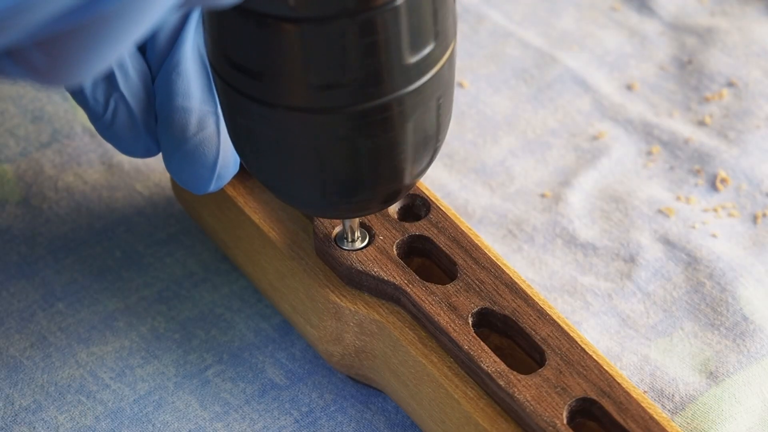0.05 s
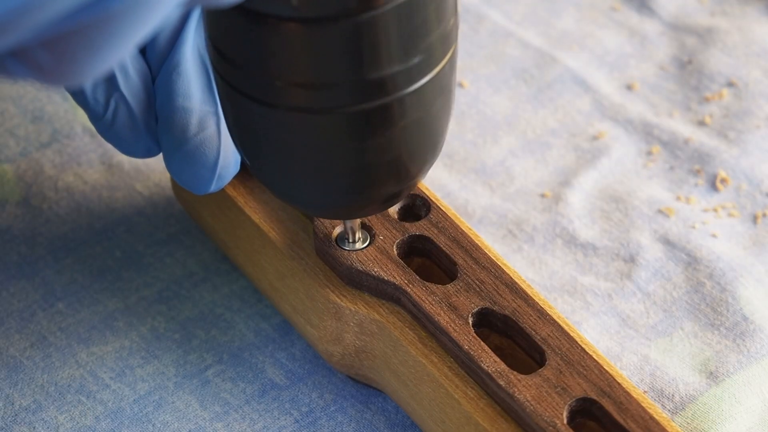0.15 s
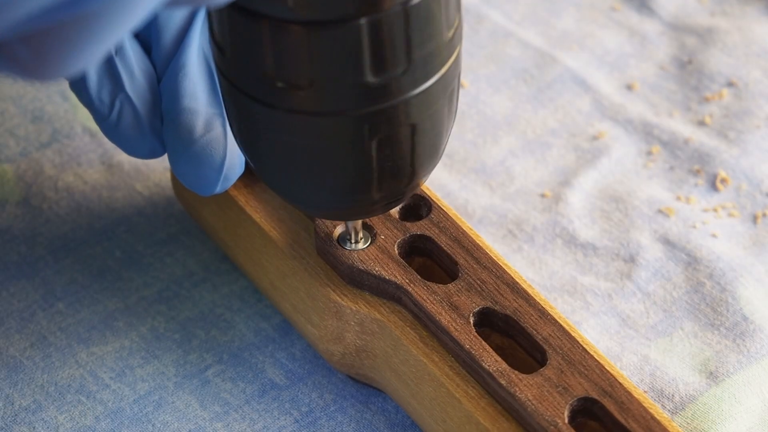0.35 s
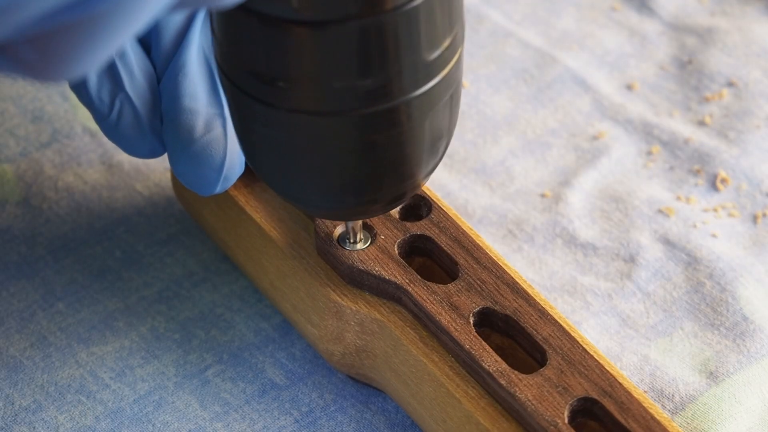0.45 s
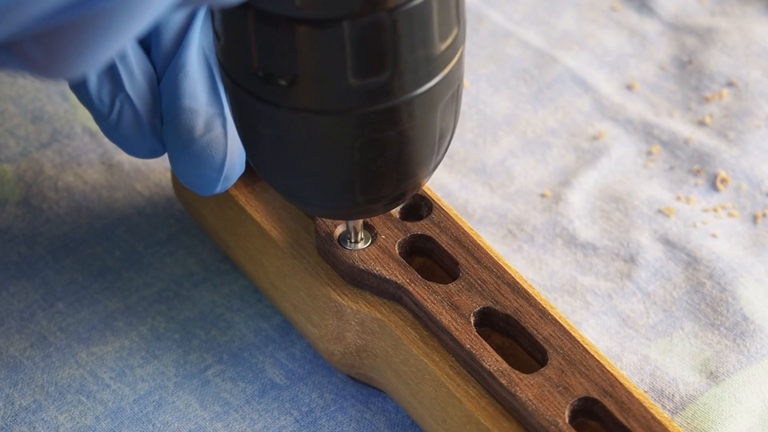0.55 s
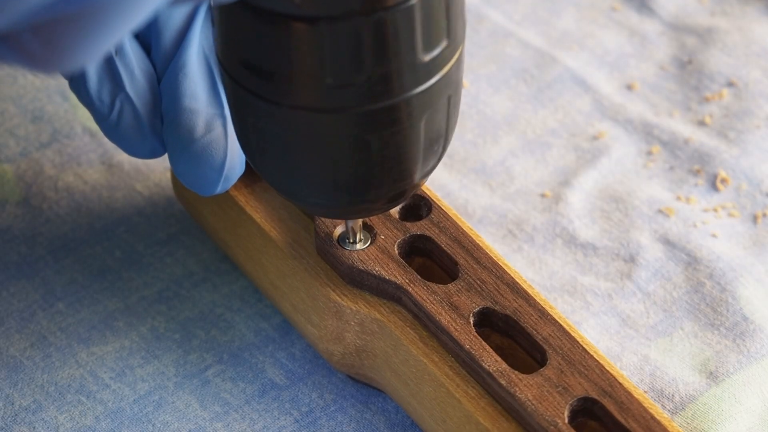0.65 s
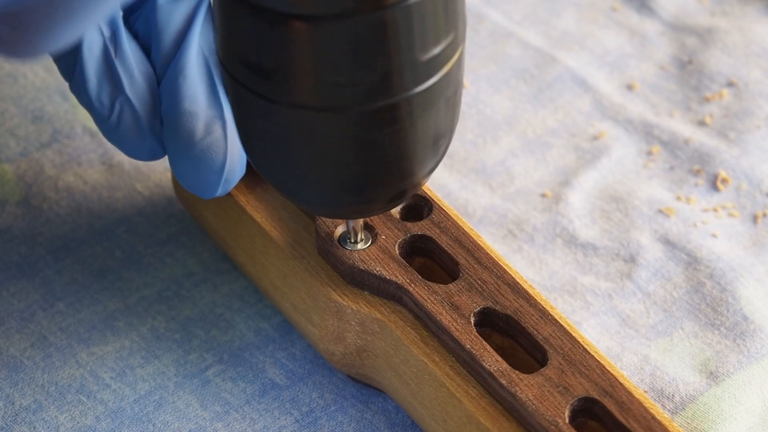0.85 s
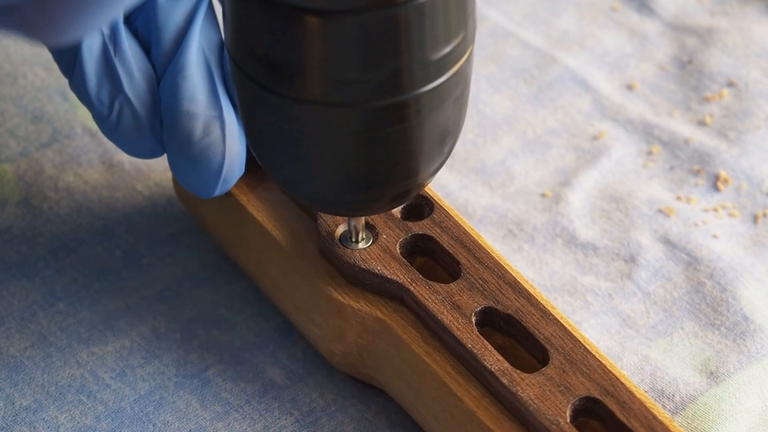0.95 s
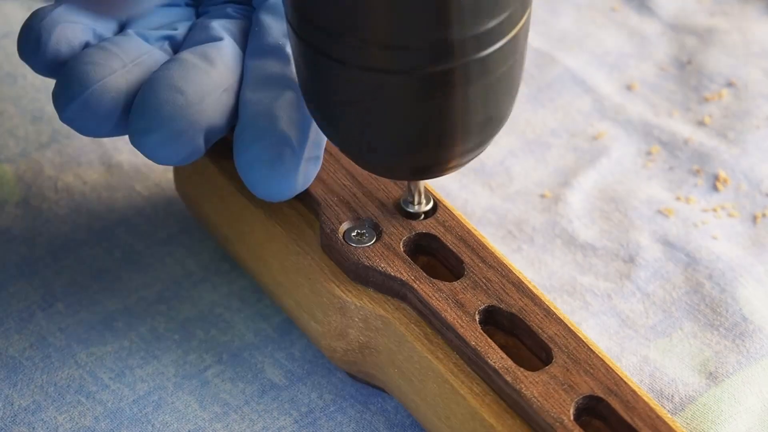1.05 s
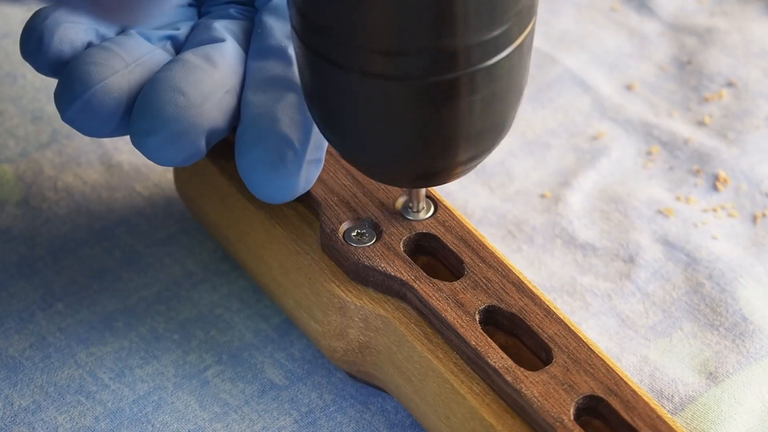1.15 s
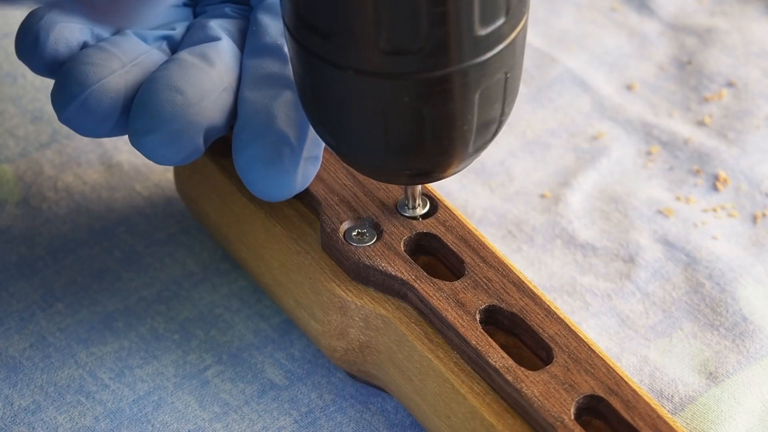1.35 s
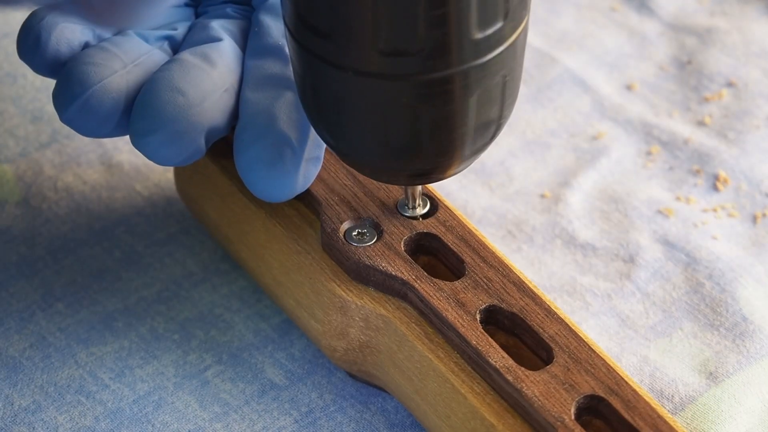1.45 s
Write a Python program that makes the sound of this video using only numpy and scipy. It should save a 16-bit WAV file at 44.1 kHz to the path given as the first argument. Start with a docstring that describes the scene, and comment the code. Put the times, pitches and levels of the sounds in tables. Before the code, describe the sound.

Close cordless drill whirring and clicking on a screw in wood, then ratcheting and winding down.

```python
"""In a small, dry workshop, a cordless drill drives a screw into wood, close to the microphones.
The speed controller whistles, motor and gears wind up, and the bit knocks in the screw head ever
more slowly. A second squeeze of the trigger makes the clutch ratchet; then the motor runs free
for a moment and coasts to a stop."""
import sys
import numpy as np
from scipy import signal
from scipy.fft import rfft, irfft, next_fast_len
from scipy.io import wavfile
from scipy.ndimage import map_coordinates

SR = 44100
rng = np.random.default_rng(int(sys.argv[2]) if len(sys.argv) > 2 else 0)


def inscribe(sig):
    """Save sig as 16-bit PCM at rate SR to the path in sys.argv[1].

    A 1-D sig is mono; a 2-D sig holds one channel per row.
    Samples are clipped to [-1, 1] before scaling.
    """
    pcm = np.round(np.clip(np.atleast_2d(sig).T, -1, 1) * 32767)
    wavfile.write(sys.argv[1], SR, pcm.astype(np.int16))


N = 66150


def amp(db):
    """Turn decibels into a gain."""
    return 10 ** (np.asarray(db) / 20)


def unit(x):
    """Scale to an average power of 1."""
    return x / np.sqrt(np.mean(x ** 2) + 1e-20)


def along(points, hz):
    """Read a table of (frequency, value) points on a log axis."""
    f, v = np.transpose(points)
    return np.interp(np.log(hz + 1), np.log(f + 1), v)


def curve(points):
    """Read a table of (time, value) points at every sample."""
    return np.interp(np.arange(N) / SR, *np.transpose(points))


def wobble(rate):
    """A smooth curve through `rate` random values a second."""
    return map_coordinates(rng.standard_normal(int(N * rate / SR) + 4), [np.arange(N) * rate / SR])


def filtered(x, response):
    """Multiply each frequency in x by response(frequency)."""
    size = 2 * next_fast_len(N)
    return irfft(rfft(x, size) * response(np.fft.rfftfreq(size, 1 / SR)), size)[..., :N]


def causal(gain):
    """A filter of this shape and power 1 that rings after a hit, never before (minimum phase)."""
    cepstrum = irfft(np.log(unit(gain) + 1e-6))
    cepstrum[1:len(cepstrum) // 2] *= 2
    cepstrum[len(cepstrum) // 2 + 1:] = 0
    return np.exp(rfft(cepstrum))


# pitches at which drill and wood ring: f/Hz, width/Hz, relative level/dB
RESONANCES = [(353, 60, 2), (541, 28, -1.5), (1460, 99, -2), (1730, 140, -9), (3500, 270, 4),
              (5570, 1400, -2), (9170, 1200, -2)]
def body(hz, ring_db):
    """Drill and wood boost the sound near their own pitches; ring_db sets how much."""
    peaks = sum(amp(db + ring_db) ** 2 / (1 + (2 * (hz - centre) / width) ** 2)
                for centre, width, db in RESONANCES)
    return np.sqrt(1 + peaks)


# how alike left and right are: f/Hz, likeness (1 or more means the same)
LIKENESS = [(60, 0.5), (400, 0.88), (1400, 2), (3000, 0.72), (9200, 0.5), (14000, -0.3)]
def radiate(pair, colour, ring_db=-60):
    """Give two unrelated signals a tone colour and spread them over left and right."""
    def response(hz):
        angle = np.arccos(np.clip(along(LIKENESS, hz), -1, 1)) / 2
        return causal(amp(along(colour, hz)) * body(hz, ring_db)) * [np.cos(angle), np.sin(angle)]
    mid, side = filtered(pair, response)
    return np.array([mid + side, mid - side])


def blows(rows, attack_s, decay_s, rattle_db, rattle_s, repeat=0):
    """Each hit is a sharp noise burst with a weaker rattle; the share `repeat` is alike every time."""
    out, t = np.zeros((2, N + SR)), np.arange(SR // 20) / SR
    fade = np.exp(-t / decay_s) + amp(rattle_db) * np.exp(-t / rattle_s)
    shape = (1 - np.exp(-t / attack_s)) * fade
    pattern = rng.choice([-1, 1], (2, len(t)))
    for start, db in rows:
        fresh = rng.choice([-1, 1], pattern.shape)
        burst = shape * (np.sqrt(repeat) * pattern + np.sqrt(1 - repeat) * fresh)
        burst /= np.linalg.norm(burst, axis=1, keepdims=True)
        out[:, round(start * SR):][:, :len(t)] += amp(db) * burst
    return out[:, :N]


# tone colour of the background: f/Hz, relative level/dB
BACKGROUND_COLOUR = [(25, 0), (140, 0), (1000, -9), (15000, -40)]
def background():
    """A faint, steady, low rush of noise."""
    return amp(-66.5) * radiate(rng.standard_normal((2, N)), BACKGROUND_COLOUR)


# how long the echo takes to fade by 60 dB: f/Hz, t/s
ECHO_FADE = [(200, 0.29), (12000, 0.2)]
def room(x):
    """The room answers with a short, blurred echo, different on each side."""
    hz, t, noise = signal.stft(rng.standard_normal((2, SR // 4)), SR, nperseg=256)
    tail = signal.istft(noise * amp(-60 * t / along(ECHO_FADE, hz)[:, None]), SR, nperseg=256)[1]
    return signal.fftconvolve(x, tail / np.linalg.norm(tail[0]), axes=1)[:, :N]


def bench(knocks, low_hz=135, width_hz=70):
    """Each knock thuds softly through the wood into the cloth-covered bench."""
    hits = [(start, -15) for start, *_ in knocks]
    thuds = blows(hits, attack_s=.00094, decay_s=.0093, rattle_db=-3, rattle_s=.02)[0]
    return filtered(thuds, lambda f: 1j * f * width_hz / (low_hz ** 2 - f ** 2 + 1j * f * width_hz))


# buzz while the motor creeps: t/s, relative level/dB
BUZZ_LEVEL = [(.025, -52.5), (.1, -67), (.165, -49.5), (.25, -66), (.4, -100)]
def brushes(turns, ring_hz=4710, width_hz=460):
    """The motor's sliding contacts tick twice a turn and ring at one high pitch."""
    ticks = np.diff(np.floor(2 * turns), prepend=0) * amp(2.7 * wobble(200))
    ring = filtered(ticks, lambda f: (2j * f * width_hz / (ring_hz**2 - f**2 + 2j * f * width_hz)) ** 2)
    return amp(curve(BUZZ_LEVEL) + .5) * unit(ring)


# loudness of the whistle: t/s, level/dB
WHISTLE_LEVEL = [(.11, -59), (.16, -51), (.25, -48), (.45, -55), (.745, -68), (.775, -49.5), (.85, -50),
                 (1.05, -54), (1.09, -47), (1.185, -47), (1.21, -85)]
def controller(switch_hz=3886, overtone_end_s=.16):
    """The switched motor current whistles at one pitch until the trigger is let go."""
    t = np.arange(N) / SR
    phase = 2 * np.pi * switch_hz * t + .14 * wobble(55)
    barely_pressed = np.clip((overtone_end_s - t) / .043, 0, 1)
    overtone = amp(-73) * np.sin(3 * phase) * barely_pressed
    return np.sqrt(2) * (amp(curve(WHISTLE_LEVEL)) * np.sin(phase) + overtone)


# loudness of the rubbing: t/s, level/dB
RUB_LEVEL = [(.265, -69), (.3, -48), (.48, -43.5), (.62, -50.5), (.9, -53), (1.055, -40.5), (1.085, -84)]
# its tone colour: f/Hz, relative level/dB
RUB_TONE = [(50, -16), (135, -1.5), (230, -7.5), (550, 1), (1600, -1), (3500, -15.5)]
def thread(grain_db=3):
    """The screw's thread rubs unevenly in the wood as long as the bit drives it."""
    rubbing = unit(amp(grain_db * wobble(160)) * rng.standard_normal((2, N)))
    return amp(curve(RUB_LEVEL)) * radiate(rubbing, RUB_TONE, ring_db=-2.5)


# loudness of the whine: t/s, relative level/dB
WHINE_LEVEL = [(.14, -74), (.23, -48), (.7, -63), (1.06, -51), (1.105, -43.5), (1.175, -43), (1.205, -48),
               (1.36, -54)]
# its tones: multiple of the shaft speed, relative level/dB
WHINE_TONES = [(2, -10.5), (3, -5.5), (6, -3.5), (9, -9), (12, -7.5), (15, -4)]
# its roughness, lowest while running free under power: t/s, phase jitter/rad
ROUGHNESS = [(.22, .6), (.29, 1.5), (1.04, 1.3), (1.08, .3), (1.185, .3), (1.23, 1.0)]
def motor(speed, turns, shell_hz=2100, shell_width_hz=420, shell_db=8):
    """The whine follows the shaft; the drill's shell sings when a tone crosses its own pitch."""
    whine, jitter = np.zeros((2, N)), curve(ROUGHNESS)
    for multiple, db in WHINE_TONES:
        phase = 2 * np.pi * multiple * turns + jitter * wobble(300)
        flutter_db = (1 + 2 * jitter) * wobble(110)
        lift_db = shell_db / (1 + (2 * (multiple * speed - shell_hz) / shell_width_hz) ** 2)
        stereo_drift = .089 * np.array([wobble(17), wobble(12)])
        whine += amp(db + lift_db + flutter_db) * np.sin(phase + stereo_drift)
    bass_cut = signal.butter(4, 600, 'high', fs=SR, output='sos')
    return amp(curve(WHINE_LEVEL)) * signal.sosfilt(bass_cut, whine)


def teeth(turns, uneven_db=4):
    """Uneven gear teeth repeat with the shaft, making many tones that fade in and out."""
    tones = np.zeros((2, N))
    for multiple in range(2, 44):
        strength = amp(uneven_db * wobble(14.12))
        phase = 2 * np.pi * (multiple * turns + rng.random((2, 1)))
        tones += strength * np.sin(phase + .75 * wobble(90))
    return unit(tones)


# loudness of the gears: t/s, level/dB
GEAR_LEVEL = [(0, -48.5), (.06, -56.5), (.12, -58.5), (.16, -48), (.23, -39.5), (.5, -40.5), (.69, -48),
              (.79, -49.5), (.85, -36.5), (.93, -33.5), (1.02, -36), (1.065, -38.5), (1.29, -41.5),
              (1.38, -51.5), (1.45, -71)]
# their tone colour when fast and when slow: f/Hz, relative level/dB
FAST_COLOUR = [(150, -50), (440, -17.5), (540, -7), (1100, -3.5), (1700, -1.5), (4700, -3.5), (6300, -7),
               (7400, -0.5), (9300, -3.5), (11000, -8.5), (13800, -4), (15800, -14.5)]
SLOW_COLOUR = [(400, -17), (800, 1), (1200, -5), (1800, 2.5), (2700, -12.5), (3700, -2), (4500, -4),
               (6300, -13.5), (8500, -5), (11000, -19.5)]
def gears(speed, turns, crawl_turns_per_s=140, chatter_db=2, teeth_db=-4):
    """Tooth tones and rubbing noise pulse with the shaft and are duller at a crawl."""
    pulse = amp(chatter_db * np.cos(2 * np.pi * turns) + 1.5 * wobble(500))
    fast_share = 1 / (1 + np.exp((crawl_turns_per_s - speed) / 35))
    grinding = rng.standard_normal((2, N)) + amp(teeth_db) * teeth(turns)
    fast = radiate(unit(pulse * grinding), FAST_COLOUR, ring_db=1)
    slow = radiate(unit(pulse * rng.standard_normal((2, N))), SLOW_COLOUR)
    return amp(curve(GEAR_LEVEL)) * (np.sqrt(fast_share) * fast + np.sqrt(1 - fast_share) * slow)


# the clutch jumps a tooth: t/s, relative level/dB
SNAPS = [(.8496, -26), (.8619, -24.5), (.8747, -24), (.8841, -20), (.8953, -24), (.9036, -20), (.9144, -22),
         (.9223, -16), (.9311, -19), (.9402, -20), (.9483, -19), (.9576, -20), (.9662, -17), (.9749, -20),
         (.9837, -19), (.9926, -19), (1.001, -19), (1.0107, -21), (1.019, -21), (1.0291, -18),
         (1.0392, -24), (1.065, -35)]
# tone colour of the snaps: f/Hz, relative level/dB
SNAP_COLOUR = [(100, -41), (340, -17.5), (800, -10.5), (1400, -5.5), (2420, -6), (3460, -7.5), (9150, -6),
               (15500, -6.5)]
def clutch():
    """The clutch balls snap over their ramps, much the same way at every tooth."""
    snaps = blows(SNAPS, attack_s=.0005, decay_s=.0009, rattle_db=-24, rattle_s=.01, repeat=.4)
    return amp(21) * radiate(snaps, SNAP_COLOUR, ring_db=6.5)


# the bit knocks in the screw head: t/s, relative steel level/dB, relative wood level/dB
BIT_KNOCKS = [(.2851, -24.5, -20), (.3098, -35, -27.5), (.3329, -20, -23.5), (.3531, -27, -19.5),
              (.3743, -17.5, -18), (.3926, -33, -24.5), (.4131, -20, -18.5), (.4312, -28.5, -26),
              (.4514, -21, -17.5), (.4740, -33, -22), (.4936, -26, -18), (.5158, -31, -26.5),
              (.5389, -23.5, -24), (.5667, -37, -23), (.5934, -24, -24), (.6267, -35, -23),
              (.659, -23, -23.5), (.7478, -29, -24.5), (.8072, -34, -29), (.8299, -24.5, -22.5)]
# tone colour of the knocks: f/Hz, relative level/dB
BIT_COLOUR = [(400, -29), (900, -8), (1430, -6.5), (2700, -4.5), (5700, -7.5), (8950, -7), (11500, -11),
              (15000, -7)]
def bit(speed, full_turns_per_s=356):
    """Steel cracks on steel and the wood answers lower down; a slower bit gives a longer, softer knock."""
    hits = np.zeros((2, N))
    bright = signal.butter(2, 2400, 'high', fs=SR)
    woody = signal.butter(2, [1200, 1850], 'band', fs=SR)
    for start, steel_db, wood_db in BIT_KNOCKS:
        slow = full_turns_per_s / speed[round(start * SR)]
        shape = dict(attack_s=.00013 * slow ** 3, decay_s=.00065 * slow, rattle_db=-29, rattle_s=.006)
        crack = signal.lfilter(*bright, blows([(start, steel_db)], **shape))
        knock = signal.lfilter(*woody, blows([(start, 0)], **shape))
        hits += crack + amp(wood_db - 12.5) * knock / np.linalg.norm(knock, axis=1, keepdims=True)
    return amp(21) * radiate(hits, BIT_COLOUR, ring_db=8)


# how fast the motor's shaft spins: t/s, speed/(turns per s)
SHAFT_SPEED = [(.025, 110.4), (.06, 78.5), (.12, 79.4), (.2, 209), (.24, 262), (.44, 337), (.7, 147),
               (.78, 154), (.91, 312), (1.06, 300), (1.092, 325), (1.128, 352), (1.17, 365), (1.19, 360),
               (1.23, 295), (1.33, 150), (1.43, 19.5)]
def scene():
    """Drill, bench and room echo over a quiet background."""
    speed = curve(SHAFT_SPEED)
    turns = np.cumsum(speed * (1 + .00294 * wobble(60))) / SR
    drill = bit(speed) + clutch() + thread() + gears(speed, turns) + motor(speed, turns) + brushes(turns)
    return background() + drill + amp(-11) * room(drill) + controller() + bench(BIT_KNOCKS)


# balance of the microphones: f/Hz, left minus right level/dB
BALANCE = [(1200, 0.15), (3400, -1.5), (5600, -1), (9200, 4.5), (11500, -0.5), (13800, -7)]
def record(dry, top_hz=15850, offset=-.0026):
    """Two microphones differ in colour; the highest treble is cut and the wave sits just off zero."""
    sides = np.array([[.5], [-.5]])
    return filtered(dry, lambda hz: amp(along(BALANCE, hz) * sides) * (hz < top_hz)) + offset


dry = scene()
out = record(dry)
inscribe(out)
```